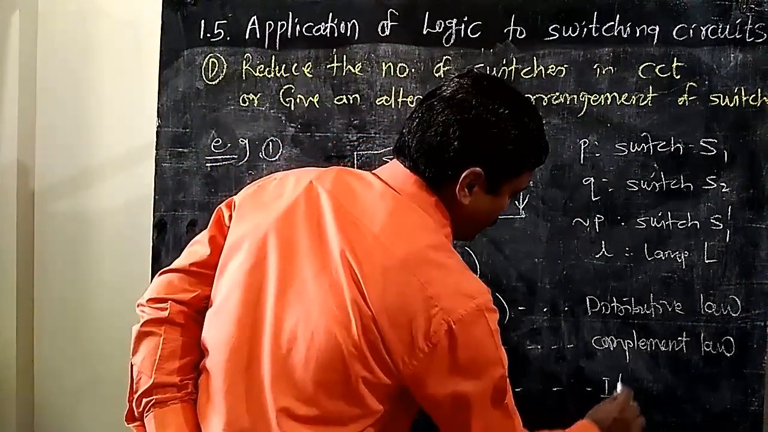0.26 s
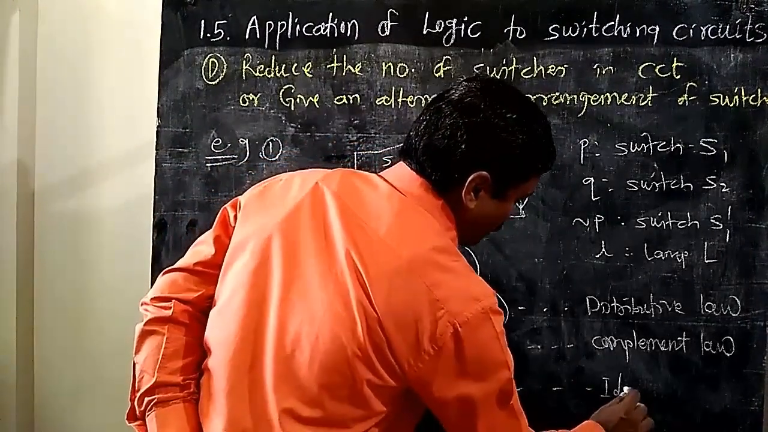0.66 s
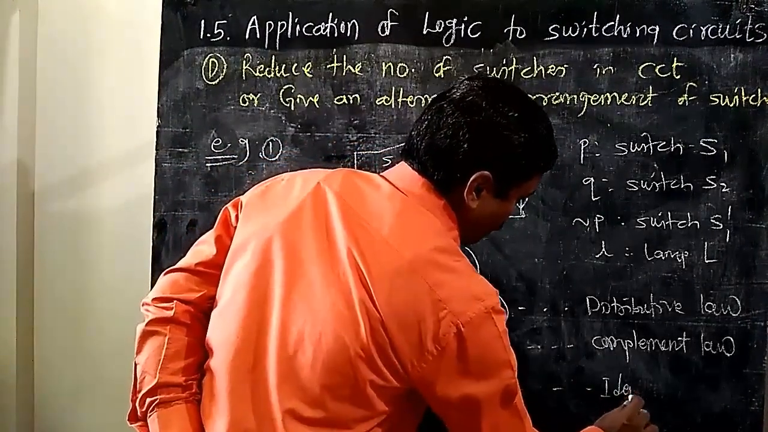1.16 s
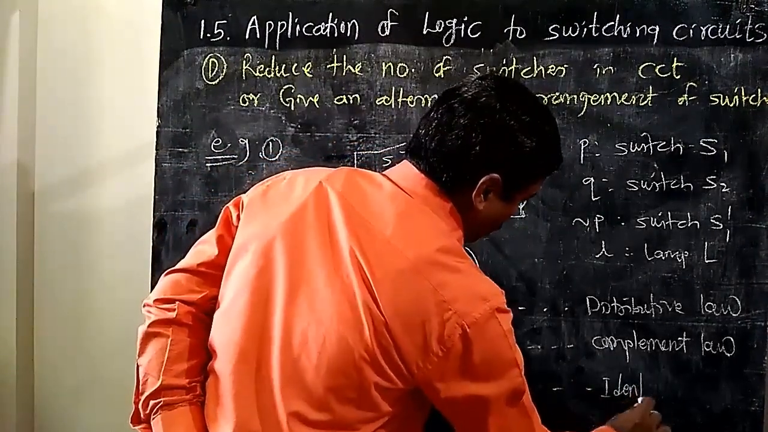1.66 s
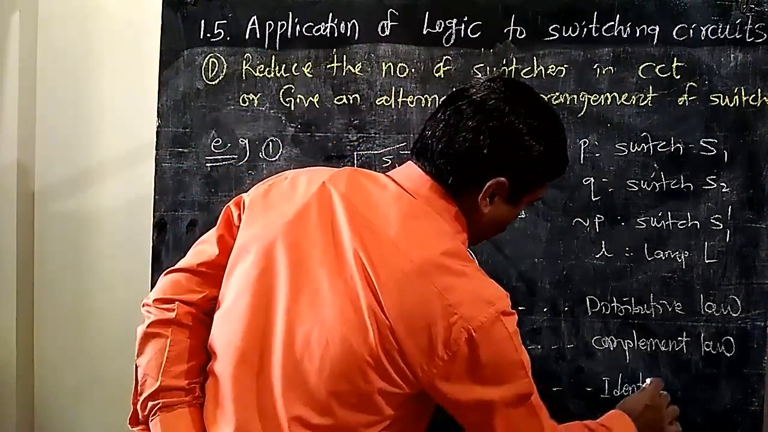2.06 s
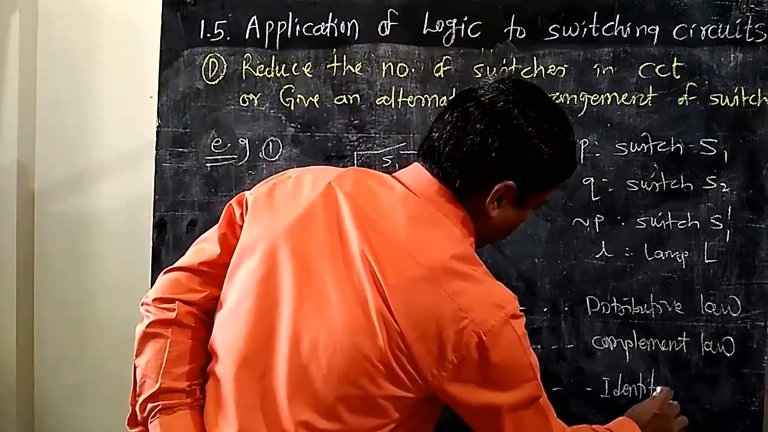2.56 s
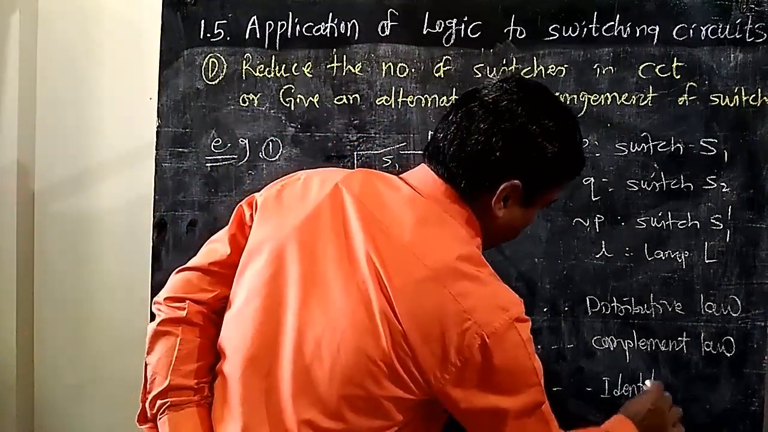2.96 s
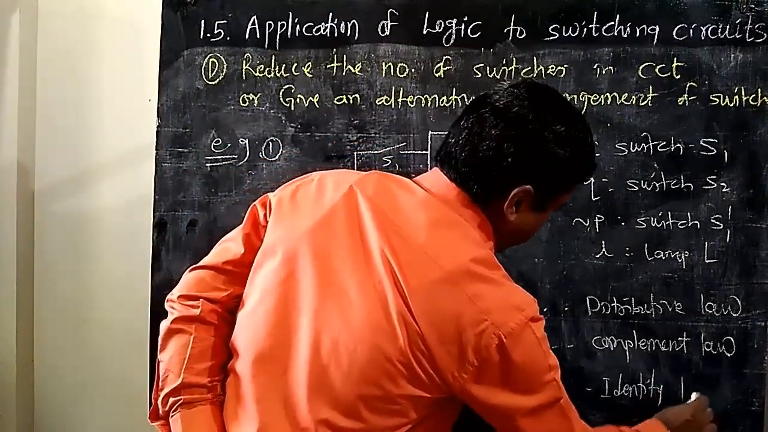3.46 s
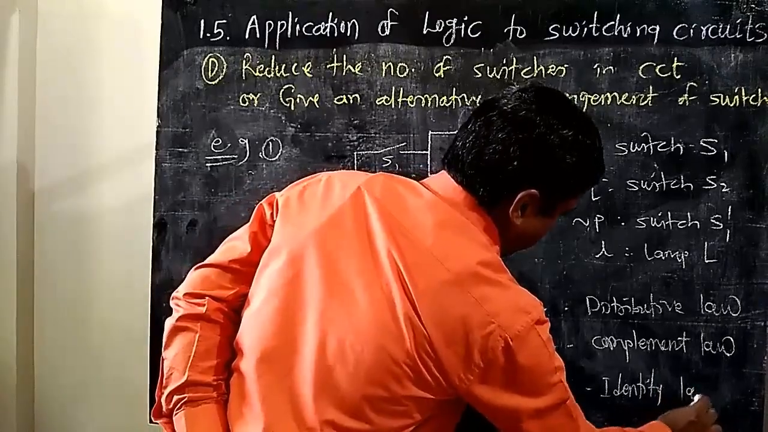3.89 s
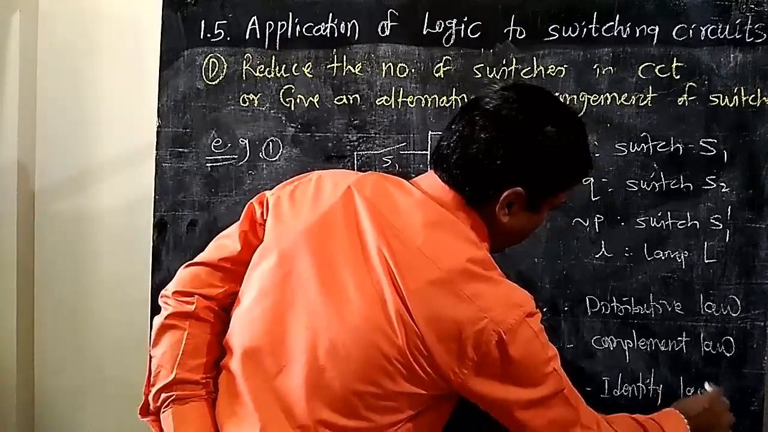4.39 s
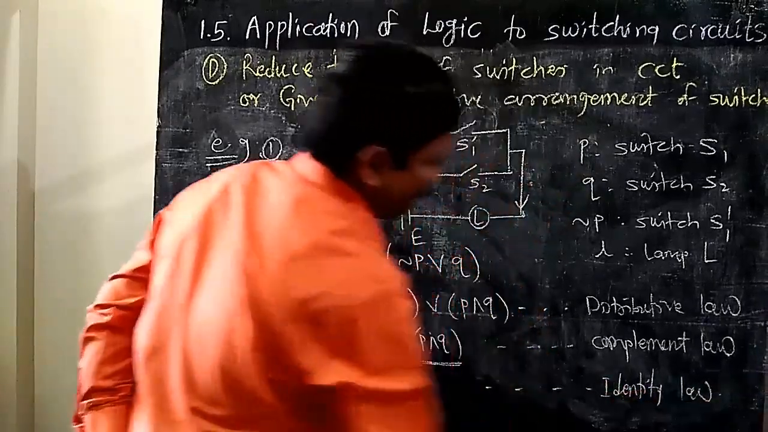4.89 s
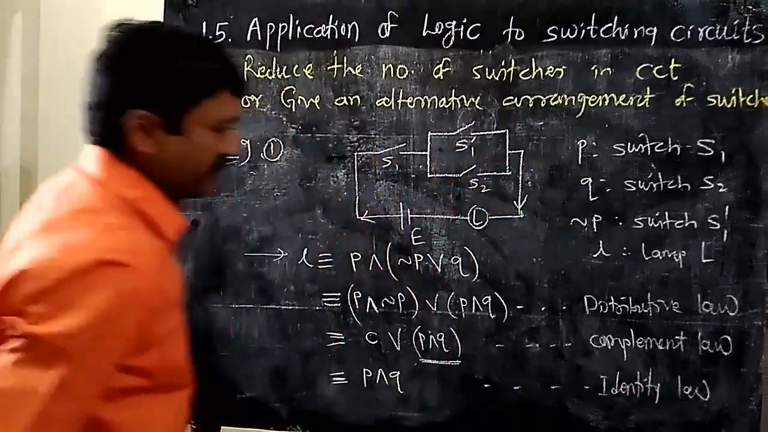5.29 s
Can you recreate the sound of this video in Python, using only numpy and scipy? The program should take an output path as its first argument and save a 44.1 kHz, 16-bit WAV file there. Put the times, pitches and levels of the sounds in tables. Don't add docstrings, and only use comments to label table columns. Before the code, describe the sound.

A quiet bare classroom with soft hiss and faint mains hum, heard through one camera microphone, nearly mono. Chalk taps a blackboard at about 0.1 and 0.3 s: dull woody knocks with a bright wall echo and a dense tail cut short by noise suppression. A faint drag follows at 0.4 s, then near silence with barely audible scratches until 1.6 s. Taps come at 1.7, 1.9, 2.2 and 2.35 s, the last two firm, then a weak double at 2.6 s, with bright little drags between. Low air puffs thump around 2.2-2.4 s and flutter from 3.05 to 3.75 s. More taps fall at 3.15 and 3.4 s, with a soft dull pair near 3.65 s. After light drags at 3.9 and 4.4 s, the chalk drops at 4.6 s, bounces quickly and rattles hollowly on a wooden ledge until about 5.0 s, amid low gusts. Only room tone remains.

```python
import sys
import numpy as np
from scipy import signal
from scipy.io import wavfile
from scipy.ndimage import uniform_filter1d

SR = 44100
rng = np.random.default_rng(int(sys.argv[2]) if len(sys.argv) > 2 else 0)


def transcribe(signal):
    frames = np.atleast_2d(signal).T
    limited = np.clip(frames, -1, 1)
    pcm = np.round(limited * 32767).astype(np.int16)
    wavfile.write(sys.argv[1], SR, pcm)


def field_ratio(decibels):
    return 10 ** (np.asarray(decibels, dtype=float) / 20)


N = 244269
LEAD = SR // 5


def evened(x):
    return x / np.sqrt(np.mean(x ** 2) + 1e-20)


def read(points, hz):
    f, value = np.transpose(points)
    return np.interp(np.log(hz + 1), np.log(f + 1), value)


def hump(hz, centre_hz, octaves):
    return np.exp(-(np.log2((hz + 1) / centre_hz) / octaves) ** 2)


def add(mix, s, sound):
    part = mix[LEAD + round(s * SR):][:len(sound)]
    part += sound[:len(part)]


def soften(x, low_hz, high_hz):
    return signal.sosfilt(signal.butter(3, [low_hz, high_hz], "bandpass", fs=SR, output="sos"), x)


def resonate(x, hz, width):
    turn = np.exp(2j * np.pi * np.cumsum(hz * np.ones(len(x))) / SR)
    r = np.exp(-np.pi * width / SR)
    return 2 * (turn * signal.lfilter([1 - r], [1, -r], x / turn + 1e-18)).real


def patches(shape, wide, long):
    field = uniform_filter1d(rng.standard_normal(shape), wide, 0)
    return evened(uniform_filter1d(field, long, 1))


def blocks(shape, count):
    values = rng.standard_normal((shape[0], shape[1] // count + 1))
    return np.repeat(values, count, axis=1)[:, :shape[1]]


def reflections(size):
    strength_db = 2.0 * np.minimum(rng.exponential(1, size), 2.5)
    return evened(rng.standard_normal(size) * field_ratio(strength_db))


def steadied(x, size):
    return evened(x / (uniform_filter1d(x ** 2, size) / np.mean(x ** 2) + .1) ** 0.45)


# [f/Hz, level/dB per Hz]
AIR = [(15, -44), (25, -18), (42, -6.5), (70, -22), (91, -11), (126, -6), (202, -9.5), (344, -15),
       (372, -11), (824, -10.5), (1070, -9.5), (1330, -14.5), (6670, -22), (11900, -42.5), (14000, -62)]
# [f/Hz, level/dB, wander width/Hz]
HUM = [(47, -73.5, 3), (100, -66, 4), (189, -71, 4.4), (290, -76.5, 6)]


def room_tone():
    hz, frame, z = signal.stft(rng.standard_normal(N), SR, nperseg=1024, noverlap=768)
    lumps_db = read([(100, 1.8), (1000, 2.55), (5000, 1.7)], hz)[:, None] * patches(z.shape, wide=8, long=10)
    shaped = z * field_ratio(read(AIR, hz)[:, None] + lumps_db)
    hiss = signal.istft(shaped, SR, nperseg=1024, noverlap=768)[1][:N]
    t = np.arange(N) / SR
    hum = np.zeros(N)
    for f, db, width in HUM:
        wander = evened(resonate(rng.standard_normal(N), f, width))
        hum += field_ratio(db) * (np.sin(2 * np.pi * f * t) + .5 * wander)
    return field_ratio(-59) * soften(evened(hiss), 28, 17000) + hum


def rub(length, db, hz, width, glide):
    size = round(length * SR)
    centre = hz * glide ** np.linspace(-.5, .5, size)
    grit = reflections(size)
    for _ in range(3):
        grit = resonate(grit, centre, width)
    unsteady = field_ratio(1.54 * patches((1, size), wide=1, long=300)[0])
    return field_ratio(db) * evened(grit) * np.hanning(size) ** 0.3 * unsteady


# [t/s, length/s, level/dB, f/Hz]
BUMPS = [(4.44, 0.093, -57, 2420), (1.205, 0.095, -60, 470), (1.32, 0.055, -61, 1100),
         (2.924, 0.113, -59, 304), (3.4, 0.21, -57, 362), (3.853, 0.12, -59.5, 324),
         (4.408, 0.036, -58.5, 830), (1.39, .065, -55.5, 44), (1.68, 0.16, -45, 184),
         (2.373, 0.13, -45, 171), (3.42, 0.21, -48, 158), (5.024, 0.047, -36.5, 74),
         (3.4, 0.088, -58, 70.4)]


def bump(length, db, hz):
    width_hz = 123 * (hz / 200) ** 0.57
    return rub(length, db, hz, width_hz, glide=1.07)


PUFF_HALF = 3000

# [crest t/s, peak level/dB, f/Hz]
PUFFS = [(2.1873, -26.5, 79), (2.2397, -23, 75), (2.296, -37, 82), (2.355, -35, 86), (2.3746, -23.5, 91.5),
         (3.0436, -40.5, 74.4), (3.1444, -35, 91), (3.1814, -20.5, 75), (3.2, -29, 67), (3.2764, -33, 72),
         (3.2993, -38, 58), (3.3216, -31, 74.4), (3.423, -29, 99), (3.474, -37, 92), (3.506, -29, 92),
         (3.5347, -23.5, 90), (3.5546, -27, 83), (3.5987, -26.5, 67.5), (3.6912, -39, 71),
         (4.5202, -40, 70), (4.5534, -36, 73.5), (4.6847, -31, 95), (4.721, -26, 95), (4.8034, -27.5, 95),
         (5.071, -24, 78)]


def puff(db, hz, width_ms):
    t = np.arange(-PUFF_HALF, PUFF_HALF) / SR
    swell = .5 ** ((2000 * t / max(width_ms, 8)) ** 2)
    swing = np.cos(2 * np.pi * hz * t)
    return field_ratio(db) * swell * (swing - np.average(swing, weights=swell))


def strong_puff(db, hz):
    return puff(db, hz, width_ms=9.5 - 0.73 * (db + 24.5))


# [t/s, length/s, level/dB]
GUSTS = [
    (1.668, .05, -49),
    (2.298, .17, -39.5),
    (3.051, .07, -43),
    (3.219, .16, -37),
    (3.62, .15, -46),
    (4.614, .06, -42),
    (4.828, .1, -35),
    (4.919, .11, -41),
]


def gust(mix, s, length, db):
    gap_s = 0.029
    for k, (late, loud, pitch) in enumerate(rng.standard_normal((12, 3))):
        at = (k + .5 + 0.16 * late) * gap_s
        if at < length:
            small = puff(db + 4 * loud, 82.5 * (1 + .12 * pitch), width_ms=14.4)
            add(mix, s + at - PUFF_HALF / SR, small)


# [t/s, force level/dB, hardness level/dB]
LEDGE = [
    (4.66, -43, 11),
    (4.69, -22, -5),
    (4.73, -27, 0),
    (4.822, -30, -17.5),
    (4.866, -25, -9.5),
    (4.89, -31, 0),
    (4.978, -41, -14.5),
    (5.02, -53.5, -7),
    (5.14, -53, -16),
]
# [f/Hz, width/Hz, level/dB]
LEDGE_MODES = [(179.3, 27.4, 0), (323, 9, 1), (458, 56, -1), (627, 26, -6)]


def ledge():
    s, low_db, upper_db = np.transpose(LEDGE)
    t = np.arange(s[0], s[-1], 1 / SR)
    rattle = rng.standard_normal(len(t)) * (rng.random(len(t)) < 900 / SR)
    low, upper = np.zeros(len(t)), np.zeros(len(t))
    for f, width, db in LEDGE_MODES:
        ring = field_ratio(db) * evened(resonate(resonate(rattle, f, width), f, 7.5 * width))
        if f < 245:
            low += ring
        else:
            upper += ring
    upper = evened(upper) + 0.33 * evened(soften(rattle, 240, 850))
    hardness = field_ratio(np.interp(t, s, upper_db))
    sound = steadied(low, size=900) + hardness * steadied(upper, size=900)
    return s[0], field_ratio(np.interp(t, s, low_db)) * sound * signal.windows.tukey(len(t), .08)


# [t/s, length/s, level/dB, f/Hz, glide factor]
STROKES = [
    (0.989, .1, -60.5, 3900, 1.3),
    (1.2, 0.1, -67.5, 4200, 1.1),
    (1.468, 0.078, -58, 4100, 1.1),
    (2.93, .15, -52, 4400, 1.5),
    (3.93, .15, -59.5, 4100, 1.01),
    (4.418, 0.15, -56.5, 4900, 0.79),
    (0.4, 0.13, -49.5, 6000, .95),
    (1.76, .12, -50, 5900, 0.76),
    (1.999, 0.083, -55, 5840, .95),
    (2.448, 0.12, -48, 6400, 0.88),
]


def stroke(length, db, hz, glide):
    return rub(length, db, hz, 0.48 * hz, glide)


# [f/Hz, level/dB per Hz]
BOARD = [(60, -61), (130, -10), (250, -15.5), (500, -3.5), (900, -1), (1300, -2.5), (2000, -4),
         (2800, -4.5), (4200, -4.5), (5500, -7.5), (7000, -17), (9000, -31), (11500, -43), (15000, -44)]
# [f/Hz, width/Hz, level/dB]
PANEL = [(886, 140, -8.5), (1038, 64, -13), (1301, 67, -6.5), (1387, 9.4, -9.5), (1528, 88, -12.5),
         (3470, 40, -26)]
# [f/Hz, time/s]
ROOM = [(150, 0.86), (500, 0.44), (1300, 0.44), (3000, 0.42), (5500, 0.46), (8000, 0.4), (12000, 0.59)]
# [f/Hz, share of its cut]
CLOSING = [(300, 1.54), (800, 1.5), (1900, 1.1), (2200, 1.06), (4800, 1.66), (5200, 0.3), (6300, 0.12),
           (6700, 0.2), (9000, 0.61), (12000, 0.12)]


def tap(walls, blow_db, bright_db, ring_hz, closes_s, knock_db, thud_db, board_hz,
        valley_db, hiss_db, air_db, linger_db):
    t = np.arange(len(walls)) / SR
    dense = 0.83 * walls + 1.25 * reflections(len(walls))
    echoes = dense + sum(field_ratio(db) * evened(resonate(dense, f, w)) * 0.2 for f, w, db in PANEL)
    hz, frame, z = signal.stft(echoes, SR, nperseg=256, noverlap=192)
    hz = hz[:, None]

    colour_db = read(BOARD, hz) + bright_db * np.clip(np.log2(hz / 1700 + 1e-3), 0, 1.6)
    colour_db += 4.26 * np.exp(-((hz - ring_hz) / 350) ** 2)
    colour_db += thud_db * hump(hz, 307, 0.87)
    colour_db += 4.4 * hump(hz, board_hz, 0.23)
    colour_db += valley_db * hump(hz, 3040, 0.27)
    colour_db += hiss_db * hump(hz, 7620, 0.33)
    colour_db += air_db * hump(hz, 11900, 0.5)

    after = np.clip(frame - closes_s, 0, None)
    cut_db = read(CLOSING, hz) * (2.65 * np.minimum(after / 0.0037, 1) + 70 * after)
    fall_db = 60 * frame / read(ROOM, hz) + cut_db - 1.04 * patches(z.shape, wide=4, long=12)
    held = np.minimum(frame, .19) - 4.2 * np.clip(frame - .21, 0, .1)
    fall_db -= linger_db * held * hump(hz, 7040, 0.58)
    bands = (3 * np.log2(1 + hz[:, 0] / 400)).astype(int)
    fall_db += 2.0 * blocks(z.shape, count=16)[bands]
    tail = signal.istft(z * field_ratio(colour_db - fall_db), SR, nperseg=256, noverlap=192)[1][:len(t)]
    tail = tail / np.std(tail[:2600])

    echo_s = 0.0062
    late = np.clip(t - echo_s, 0, None)
    build = np.where(t < echo_s, .3, 0.65 + .5 * (1 - np.exp(-late / 0.012)))
    knock = field_ratio(knock_db) * 3.46 * np.sin(2 * np.pi * 850 * t) * np.exp(-t / 0.00052)
    ring = np.sin(2 * np.pi * ring_hz * late) * np.exp(-late / .0022)
    ring = ring * field_ratio(5.5 + bright_db + .7 * knock_db)
    return field_ratio(blow_db) * (tail * build * np.minimum(t / 0.00026, 1) + soften(knock + ring, 200, 8700))


FIRM_DB = -22
CLOSES_S, CLOSES_S_PER_DB = .11, 0.02

# [t/s, blow level/dB, brightness level/dB, chalk ring f/Hz, thud level/dB]
BOUNCES = [
    (4.6122, -20, -5, 4150, 0),
    (4.64, -25, -3.5, 1500, 2.5),
    (4.7001, -29, -.8, 5220, 15),
    (4.845, -43, -15, 1700, 10),
]


def bounce(walls, s, blow_db, bright_db, ring_hz, thud_db):
    firm = blow_db - FIRM_DB
    return tap(walls, blow_db, bright_db, ring_hz,
               closes_s=max(1.1 * CLOSES_S + CLOSES_S_PER_DB * firm, .06),
               knock_db=8 + 1.6 * bright_db,
               thud_db=thud_db,
               board_hz=700,
               valley_db=-4,
               hiss_db=-7 + .7 * thud_db,
               air_db=-9,
               linger_db=1)


# [t/s, blow level/dB, brightness level/dB, chalk ring f/Hz, scrape level/dB]
TAPS = [(-.022, -38.5, -1, 3500, -2), (0.1232, -22, .5, 3740, 1), (0.3216, -23, 1, 4160, 2.5),
        (1.6678, -20.5, 1, 4100, -9), (1.9014, -25, -1, 3930, -2), (2.1926, -18, 1, 4340, 1.5),
        (2.3466, -18.5, 3, 4280, 4.5), (2.611, -28, -0.5, 4730, -8), (2.636, -32, -1.5, 3480, -13.5),
        (3.1483, -18.5, .5, 3250, -4), (3.3943, -23, -3.5, 4220, 14), (3.6429, -29, -6.5, 3360, -30),
        (3.68, -35, -3.5, 2200, -30)]


def board_tap(walls, s, blow_db, bright_db, ring_hz, scrape_db):
    firm = blow_db - FIRM_DB
    return tap(walls, blow_db, bright_db, ring_hz,
               closes_s=np.clip(CLOSES_S + CLOSES_S_PER_DB * firm, 0.039, .118),
               knock_db=-3 + 0.7 * firm,
               thud_db=0.5 - 0.5 * s,
               board_hz=1110 + 72 * s,
               valley_db=-0.7 - 0.16 * bright_db,
               hiss_db=2.5 + 0.37 * scrape_db,
               air_db=scrape_db,
               linger_db=15.5 + 2.5 * scrape_db)


def scene():
    mix, walls = np.zeros(N + LEAD), reflections(20000)
    for s, length, db, hz in BUMPS:
        add(mix, s, bump(length, db, hz))
    for s, db, hz in PUFFS:
        add(mix, s - PUFF_HALF / SR, strong_puff(db, hz))
    for row in GUSTS:
        gust(mix, *row)
    add(mix, *ledge())
    for s, length, db, hz, glide in STROKES:
        add(mix, s, stroke(length, db, hz, glide))
    for rows, strike in ((BOUNCES, bounce), (TAPS, board_tap)):
        for row in rows:
            add(mix, row[0], soften(strike(walls, *row), 117, 17000))
    return np.tile(mix[LEAD:] + room_tone(), (2, 1))


def treble_edge(hz, power):
    quiet_edge_hz, knee_hz = 12500, 9500
    frames = 8
    block = np.add.reduceat(power, np.arange(0, power.shape[1], frames), axis=1) / frames
    total_db = 10 * np.log10(block.sum(0) + 1e-20)
    treble_db = 10 * np.log10(block[(hz > 7000) & (hz < 9000)].sum(0) + 1e-20)
    rise_db = np.clip(treble_db - np.roll(treble_db, 2) - 8.5, 0, 10)
    share_db = treble_db - total_db + 27
    busy_hz = knee_hz + share_db * np.where(share_db > 0, 340, 135)
    busy_hz = busy_hz + 75 * rise_db * np.clip(total_db + 27, 0, 6.0)
    busy = np.clip((total_db + 53) / 7.0, 0, 1)
    edge_hz = np.clip(quiet_edge_hz + busy * (busy_hz - quiet_edge_hz), 6500, 15200)
    return np.repeat(edge_hz, frames)[:power.shape[1]]


# [f/Hz, level/dB under the block's total]
MASKING = [(3000, -55), (5000, -51), (7000, -50), (9000, -46.5), (11000, -57), (14000, -64)]


def camera_thinning(x):
    hz, frame, z = signal.stft(x, SR, nperseg=512, noverlap=384)
    power = abs(z) ** 2
    bins = 6
    band = np.arange(len(hz)) // bins
    band_db = 10 * np.log10(np.add.reduceat(power, np.arange(0, len(hz), bins), axis=0) + 1e-20)
    total_db = 10 * np.log10(power.sum(0) + 1e-20)
    band_db = uniform_filter1d(band_db - total_db, size=8, axis=1)
    margin_db = (band_db + 3.0 * blocks(band_db.shape, count=8))[band] - read(MASKING, hz)[:, None]
    below_edge = np.clip((treble_edge(hz, power) - hz[:, None]) / 150, 0, 1)
    kept = np.clip(margin_db / 1.4 + .5, 0, 1) * below_edge
    return signal.istft(z * kept, SR, nperseg=512, noverlap=384)[1][:N]


# [f/Hz, side level/dB under mid]
SIDE_LEAK = [(60, -46), (120, -43), (240, -51), (470, -37.5), (940, -49), (1870, -35), (3720, -43),
             (7390, -26), (14700, 19)]


def side_error(mid):
    hz, frame, z = signal.stft(mid, SR, nperseg=1024)
    leak = field_ratio(np.minimum(read(SIDE_LEAK, hz), -15))[:, None]
    z = z * leak * np.exp(2j * np.pi * rng.random(z.shape))
    return signal.istft(z, SR, nperseg=1024)[1][:N]


def top_cut(x):
    return signal.sosfilt(signal.butter(12, 15310, fs=SR, output="sos"), x)


def record(dry):
    mid = camera_thinning(dry[0])
    side = side_error(mid)
    return top_cut(np.array([mid + side, mid - side]))


dry = scene()
out = record(dry)
transcribe(out)
```